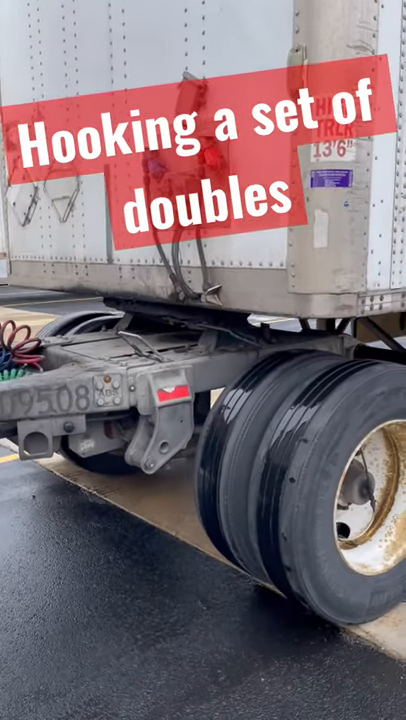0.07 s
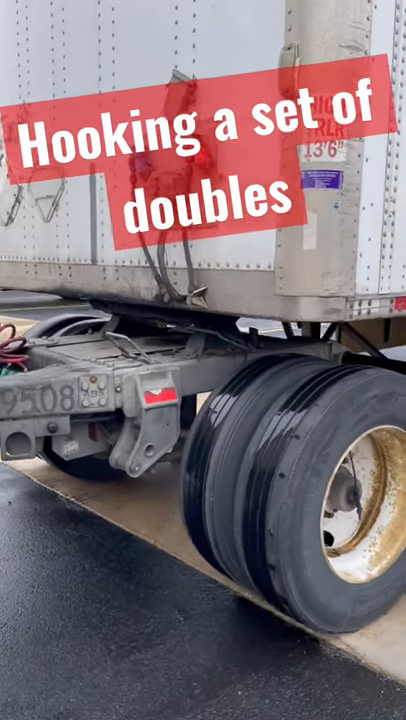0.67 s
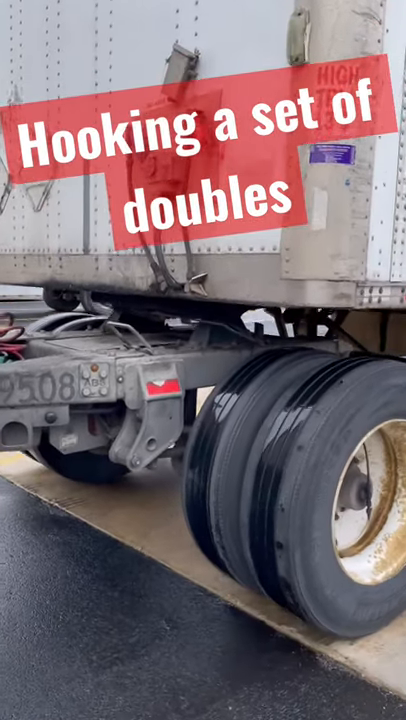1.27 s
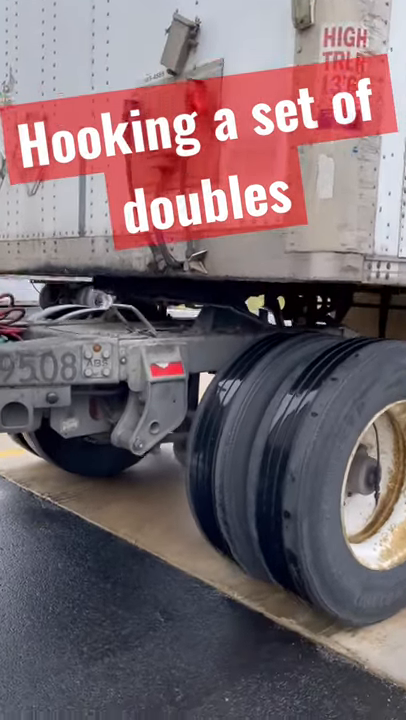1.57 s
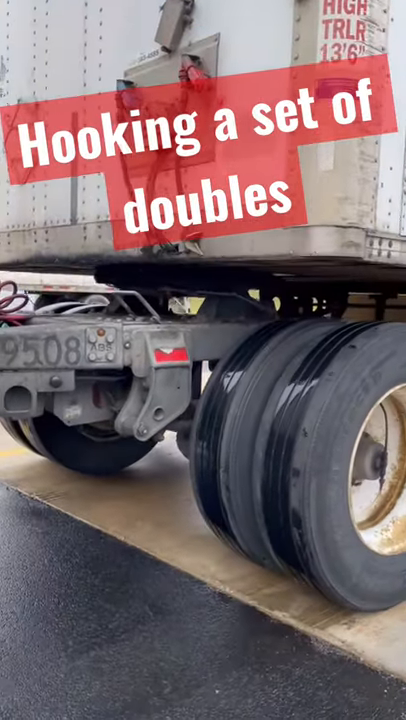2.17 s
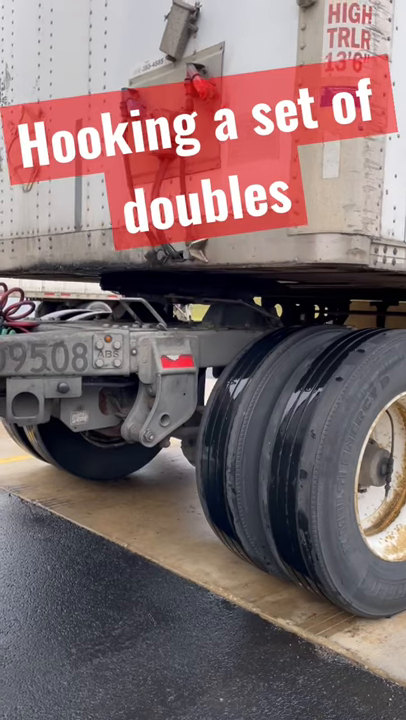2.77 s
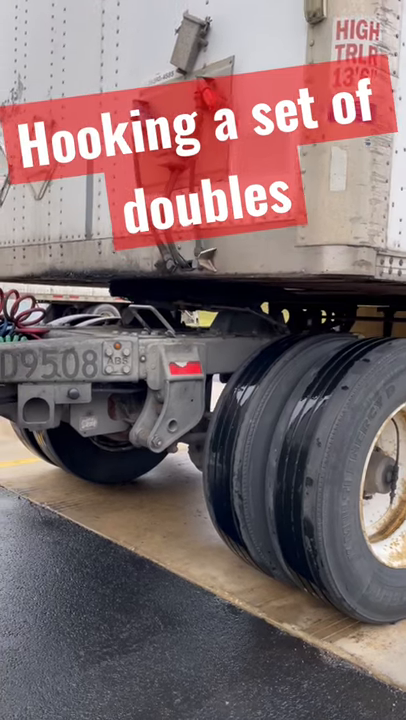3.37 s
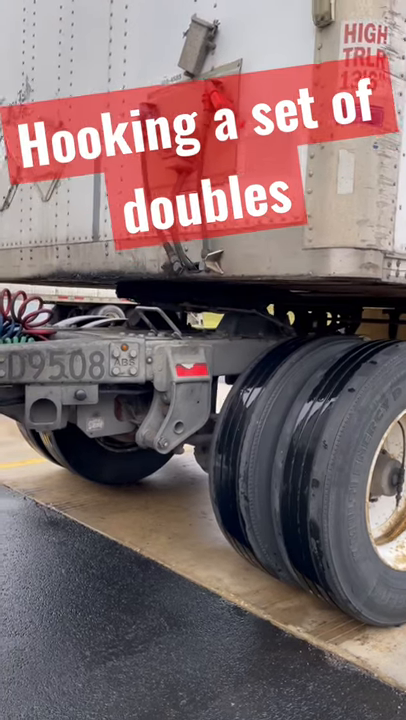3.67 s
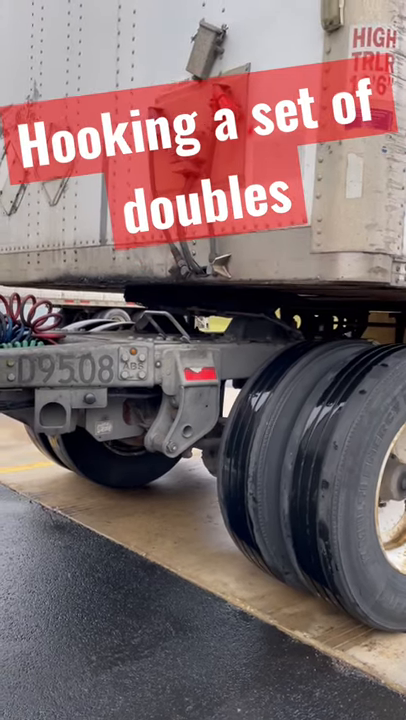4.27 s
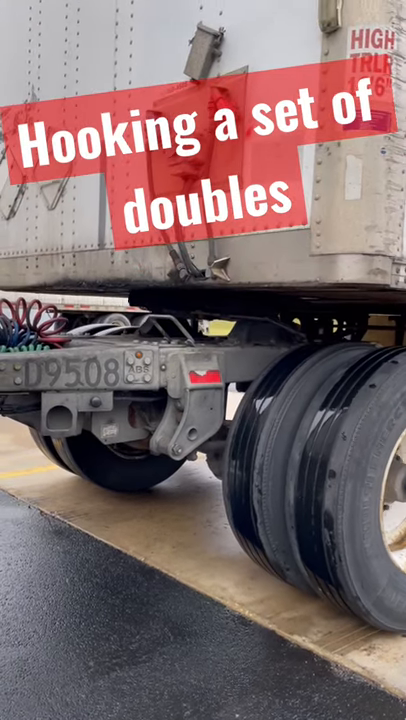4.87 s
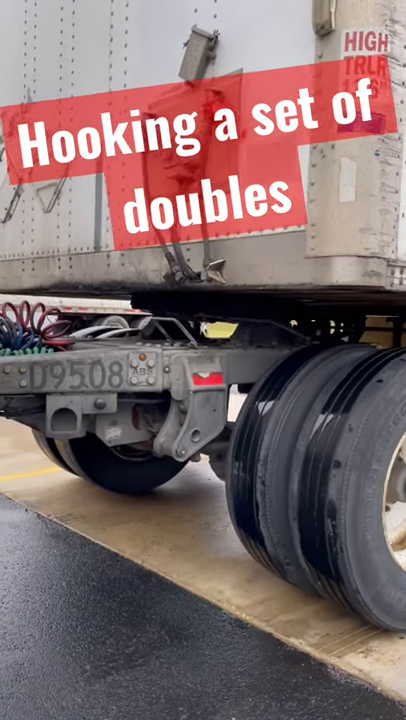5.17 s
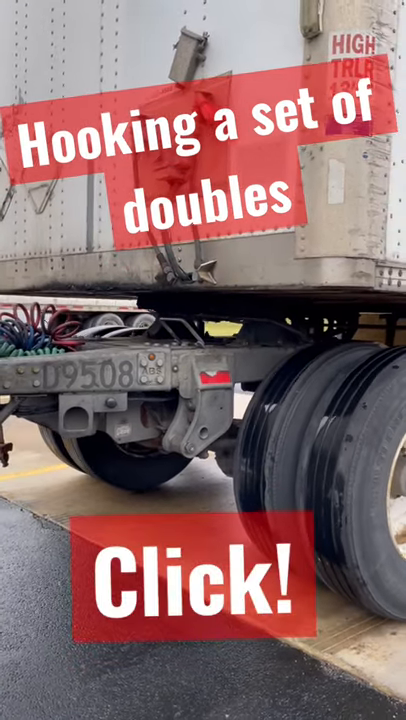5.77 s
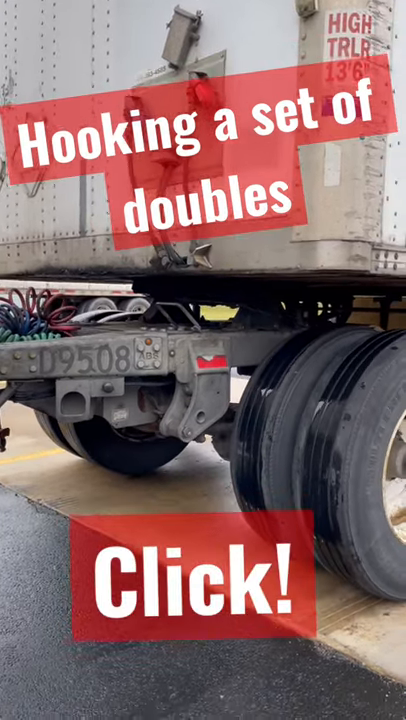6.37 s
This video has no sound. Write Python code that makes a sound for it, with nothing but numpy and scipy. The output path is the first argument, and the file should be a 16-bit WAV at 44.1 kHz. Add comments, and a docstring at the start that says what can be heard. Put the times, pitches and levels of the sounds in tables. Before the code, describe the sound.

A diesel truck labours some way off in an open yard, then settles to a throbbing idle as it backs a dolly under a trailer. Close to the microphone, steel bumps dully and slides with faint whines and low thumps. Near the end, knocks build to a loud metallic slam and a second sharp clank as the coupling locks, with bursts of hissing air and jangling chains.

```python
"""A diesel tractor labours, then idles, some way off in an open yard, backing a converter dolly under a
parked trailer; its firings pulse in the exhaust and make the panels clatter. Close by, the fifth wheel
bumps and slides under the trailer floor, the kingpin slams home and the jaws lock with a second clank,
each impact exciting the modes of the steel frame. Turbulent air hisses and loose steel keeps jangling.
All is heard through two closely spaced microphone ports."""
import sys
import numpy as np
from scipy import signal
from scipy.fft import rfft, irfft, next_fast_len
from scipy.io import wavfile

SR = 44100
rng = np.random.default_rng(int(sys.argv[2]) if len(sys.argv) > 2 else 0)


def bounce(signal):
    """Save signal as a 16-bit WAV file at the path given by the first command-line argument."""
    frames = np.transpose(np.atleast_2d(signal))
    limited = np.clip(frames, -1, 1)
    pcm = np.round(limited * 32767).astype(np.int16)
    wavfile.write(sys.argv[1], SR, pcm)


N = 292824
TIME = np.arange(N) / SR
EDGES_HZ = 22 * 2 ** (np.arange(30) / 3.05)
CENTRES_HZ = np.sqrt(EDGES_HZ[1:] * EDGES_HZ[:-1])

# Response of the struck frame. Each row: frequency in Hz, relative spectral density in dB.
FRAME_SPECTRUM = [(22, -50), (80, 11), (170, -6.5), (280, 0.5), (550, 3), (900, 1), (1400, 0.5),
                  (2300, -3.5), (3500, -5), (4700, -23.5), (5600, -5.5), (8000, -18.5), (11000, -35),
                  (16000, -41)]
# Distinct modes of the frame and kingpin plate. Each row: frequency in Hz, bandwidth in Hz, gain in dB.
STEEL_MODES = [(160, 12, 3), (245, 10, 4), (287, 10, 8), (324, 10, 1), (376, 24, -3), (444, 8, 1),
               (494, 14, 3), (517, 16, 6), (617, 22, 0), (688, 16, 1), (790, 20, 4), (865, 20, 1),
               (1012, 30, 8), (1104, 16, 0), (1257, 18, 1), (1381, 18, -2), (1431, 20, 0), (1632, 12, -1),
               (1765, 30, 0), (1882, 22, 1), (2030, 24, 1), (2111, 20, 0), (2180, 30, 0), (2356, 26, 3),
               (2480, 30, 3), (2620, 30, 1), (2872, 30, 0), (2935, 30, 1), (3490, 70, 5), (3800, 70, 3),
               (4220, 60, 2), (4533, 40, 2), (5450, 200, 3), (7000, 40, 7)]
# The dolly slams into the trailer. Each row: start in seconds; the crack's level in dB, pitch in Hz and
# treble corner in Hz; the body's level in dB, pitch in Hz, boom in dB, length factor and delay in
# seconds; the rebound's delay in seconds and loss in dB; the settling delay in seconds.
SLAMS = [(1.380, -28.5, 1500, 8000, -20, 536, 16.5, 0.39, 0.00404, 0.015, 3, 0.023),
         (5.41, -7, 4200, 7200, -13, 540, 13, 0.69, 0.00518, .0175, 0.5, .046),
         (5.899, -4, 2420, 4340, -7, 850, -4, 0.4, .002, 0.026, 20, 0.038)]


def from_db(db):
    """Amplitude grows tenfold for every 20 dB."""
    return 10 ** (np.asarray(db) / 20)


def unit_power(x):
    """Division by the RMS value gives a mean power of 1."""
    return x / np.sqrt(np.mean(x ** 2) + 1e-20)


def at_hz(points, hz):
    """Interpolation along a logarithmic frequency axis."""
    frequencies, values = np.transpose(points)
    return np.interp(np.log(hz), np.log(frequencies), values)


def drift(rate):
    """Random modulation of unit power that changes course about rate times a second."""
    knots = rng.standard_normal(int(N / SR * 400))
    return unit_power(np.interp(TIME * rate, np.arange(len(knots)), knots))


def envelope(start, attack, hold, fade_db_per_s):
    """A linear rise and a hold, then exponential decay."""
    t = TIME - start
    return np.clip(t / attack, 0, 1) * from_db(-fade_db_per_s * np.maximum(t - attack - hold, 0))


def swell(peak_s, half_width_s):
    """A Gaussian pulse, down to 1/e one half-width from its peak."""
    return np.exp(-((TIME - peak_s) / half_width_s) ** 2)


def ring(force, hz, t60):
    """A damped oscillator answers a unit impulse with a decaying sine of height 1."""
    r, w = from_db(-60 / (t60 * SR)), 2 * np.pi * hz / SR
    return signal.lfilter([0, np.sin(w)], [1, -2 * r * np.cos(w), r * r], force + 1e-18)


def resonance(x, hz, width_hz):
    """A two-pole resonator passes a narrow band with a peak gain of 1."""
    r, w = np.exp(-np.pi * width_hz / SR), 2 * np.pi * hz / SR
    zeros = np.array([1, 0, -1]) * (1 - r * r) / 2
    return signal.lfilter(zeros, [1, -2 * r * np.cos(w), r * r], x + 1e-18)


def pitched_noise(hz, width_hz):
    """Two resonators in series narrow white noise to a rough tone of unit power."""
    return unit_power(resonance(resonance(rng.standard_normal(N), hz, width_hz), hz, width_hz))


def noise_bands(correlation):
    """Partly coherent noise at two ports, in third octaves of unit power: bands x 2 x N."""
    white, bands = rng.standard_normal((2, 2, N)), []
    for k, hz in enumerate(CENTRES_HZ):
        bandpass = signal.butter(2, EDGES_HZ[k:k + 2], "band", fs=SR, output="sos")
        mid, side = signal.sosfilt(bandpass, white[k % 2])
        alike = np.clip(at_hz(correlation, hz), 0, 1)
        bands.append(unit_power(np.sqrt(1 + alike) * mid + np.sqrt(1 - alike) * side * [[1], [-1]]))
    return np.array(bands, np.float32)


def band_gains(spectrum):
    """Band power is spectral density times bandwidth; the squared gains sum to 1."""
    gain = from_db(at_hz(spectrum, CENTRES_HZ)) * np.sqrt(CENTRES_HZ)
    return gain / np.linalg.norm(gain)


def coloured(bands, spectrum):
    """Weighted bands superpose into steady noise of the given spectrum."""
    return np.tensordot(band_gains(spectrum).astype(np.float32), bands, 1)


def ports(x, phase_lead):
    """Diffraction round the housing gives the left port a phase lead that depends on frequency."""
    size = next_fast_len(N + 2048)
    lead = np.interp(np.arange(size // 2 + 1) * SR / size, *np.transpose(phase_lead))
    return irfft(rfft(x, size) * np.exp(.5j * lead * np.array([[1], [-1]])), size)[:, :N]


def whines(fade_s=0.019, surge_db=2):
    """Narrow-band noise from the fan, gears and dragging brakes is heard as faint pitches."""
    # Each row: start and end in seconds, frequency and bandwidth in Hz, level in dB.
    whine_bands = [(1.8, 5.2, 870, 120, -57), (3.6, 5.0, 838, 45, -55), (1.8, 5.0, 1340, 45, -59),
                   (1.7, 2.7, 1820, 70, -60), (2.5, 4.2, 2710, 45, -63), (2.5, 4.9, 2850, 55, -66),
                   (2.0, 4.9, 3640, 110, -68), (2.8, 4.9, 4020, 80, -62.5), (4.25, 4.55, 3300, 90, -60)]
    out = np.zeros(N)
    for start, end, hz, width_hz, db in whine_bands:
        gate = np.clip(np.minimum(TIME - start, end - TIME) / fade_s, 0, 1)
        out += pitched_noise(hz, width_hz) * from_db(db + surge_db * drift(5.9)) * gate
    return out


def rolling(end_s=1.82, fade_db_per_s=61):
    """Free rolling holds at 1, then decays exponentially once the plate drags under the trailer."""
    return from_db(-fade_db_per_s * np.maximum(TIME - end_s, 0))


def rumble(bands, firing_phase, idle_db=-42, rolling_db=-34.5, throb=0.39):
    """Incoherent sources add in power: engine, wheels and swaying trailer, throbbing with each firing."""
    # Each row: frequency in Hz, relative spectral density in dB.
    spectrum = [(22, -60), (35, -12.5), (65, 0.5), (100, 0), (150, -3), (210, -9.5), (300, -14.5),
                (450, -21.5), (900, -56), (16000, -102)]
    # Sways of the empty trailer. Each row: peak time in seconds, level in dB, half-width in seconds.
    sways = [(3.477, -38.5, 0.14), (5.043, -38.5, 0.41), (5.596, -28.5, 0.22), (6.265, -29, 0.078)]
    sway_power = sum((from_db(db) * swell(s, width)) ** 2 for s, db, width in sways)
    level = np.sqrt(from_db(idle_db) ** 2 + (from_db(rolling_db) * rolling()) ** 2 + sway_power)
    return level * coloured(bands, spectrum) * (1 + throb * np.cos(firing_phase))


def clatter(bands, firing_phase, level_db=-39.5, rolling_db=0.5, uneven_db=0.7, knock=0.12):
    """Diesel noise, its lower part modulated by the firings, forces the tractor's panels to resonate."""
    # Each row: frequency in Hz, relative spectral density in dB.
    spectrum = [(22, 12), (200, -5.5), (400, -0.5), (600, 1.5), (900, -1), (1300, -5.5), (2200, -13.5),
                (3400, -15), (4600, -21), (6200, -24), (8000, -34.5), (11000, -31.5), (16000, -36.5)]
    # Panel modes. Each row: frequency in Hz, bandwidth in Hz, gain in dB.
    panels = [(685, 17, -9), (907, 50, -4), (1176, 13, -20), (1870, 42, -2.5), (2150, 97, -10),
              (3230, 330, -14)]
    noise = from_db(level_db + rolling_db * rolling() + uneven_db * drift(35)) * coloured(bands, spectrum)
    lows = signal.sosfilt(signal.butter(1, 1500, fs=SR, output="sos"), noise)
    drive = noise + knock * np.cos(firing_phase) * lows
    ringing = sum(from_db(db + 2.9 * drift(4.1)) * resonance(drive, hz, width) for hz, width, db in panels)
    return drive + ringing


def exhaust(firing_phase, level_db=-41, push_db=5, waver_db=2.5, jitter_radians=0.23):
    """Nearly periodic pulses form a harmonic series whose balance and level follow the engine's load."""
    # Each row: multiple of the firing rate, relative level in dB at idle and with the clutch pulling.
    harmonics = [(1, -3.5, -19), (2, 1.5, 1), (3, -3, -1), (4, 1, 8), (5, -5.5, -7.5), (6, -27, -4),
                 (7, -9.5, -5.5), (8, -10.5, -14), (9, -13, -25)]
    clutch_out_s, clutch_fade_s = 1.46, 0.16
    pull = np.clip((clutch_out_s - TIME) / clutch_fade_s + .5, 0, 1)
    tones = np.zeros(N)
    for k, idle_db, pull_db in harmonics:
        gain = from_db(idle_db + (pull_db - idle_db) * pull + waver_db * drift(14))
        phase = round(k) * firing_phase + rng.uniform(0, 2 * np.pi) + jitter_radians * drift(15)
        tones += gain * np.cos(phase)
    push = swell(peak_s=5.13, half_width_s=0.55)  # the engine labours to push the dolly home
    return tones * from_db(level_db + push_db * push)


def tractor():
    """One firing cycle paces rumble, clatter and exhaust; load drags it down, then it returns to idle."""
    # Engine speed. Each row: time in seconds, firings per second.
    firing_rate = [(0, 40.3), (.9, 40.8), (1.05, 34.5), (1.27, 27.8), (1.55, 36), (3, 35.5), (6.6, 34.7)]
    # Likeness of the two ports. Each row: frequency in Hz, correlation from 0 to 1.
    correlation = [(60, .9), (130, .82), (300, .86), (700, .7), (2000, .6), (4000, .5), (7000, .6),
                   (9000, .997), (11000, .997), (16000, .85)]
    firing_phase = 2 * np.pi * np.cumsum(np.interp(TIME, *np.transpose(firing_rate))) / SR
    bands = noise_bands(correlation)
    return rumble(bands, firing_phase) + clatter(bands, firing_phase) + exhaust(firing_phase)


def thumps(right_bias_db=0.5):
    """Low pressure pulses, a few cycles long at most, push a little harder on the right port."""
    # Each row: peak time in seconds, level in dB, frequency in Hz, half-width in seconds.
    pulses = [(1.416, -24, 164, 0.022), (1.625, -28, 177, 0.0034), (3.34, -10, 107, 0.0054),
              (3.51, -24, 72, 0.016), (3.556, -28, 123, 0.016), (3.574, -24, 177, 0.0053),
              (4.305, -22, 198, 0.0021), (4.339, -24, 115, 0.0084)]
    pressure = sum(from_db(db) * swell(s, width) * np.sin(2 * np.pi * hz * (s - TIME))
                   for s, db, hz, width in pulses)
    return pressure * from_db([[-right_bias_db / 2], [right_bias_db / 2]])


def shaking(attack_s=0.0053, fade_db_per_s=35):
    """Each jolt adds energy to the swing of the loose steel, and damping slowly drains it."""
    # Each row: start in seconds, level in dB.
    jolts = [(4.95, -59), (5.41, -47), (6.14, -42), (6.46, -46.5)]
    return np.sqrt(sum((from_db(db) * envelope(s, attack_s, 0, fade_db_per_s)) ** 2 for s, db in jolts))


def jangle(touches_per_s=90, gain_db=5, mistune=0.0027):
    """Chains and fittings collide at random; like parts ring at slightly different pitches and beat."""
    # Each row: frequency in Hz, relative level in dB, 60 dB decay time in seconds.
    modes = [(1930, 2.5, 0.24), (2255, 6, 0.24), (2484, 0.5, 0.18), (2654, -5.5, .12), (2850, -4.5, .12),
             (3040, -12, 0.19), (3240, -19, .06), (3430, 3.5, 0.13), (3790, -2.5, 0.089), (5300, -12, 0.11),
             (5280, -6, 0.13), (5580, -0.5, 0.24), (5782, -16, .08), (5820, -1, 0.34), (6616, -27, .1)]
    force = (rng.random(N) < touches_per_s / SR) * shaking()
    rings = sum(from_db(db) * ring(force * rng.standard_normal(N), hz * pitch, t60) / np.sqrt(t60)
                for hz, db, t60 in modes for pitch in (1 - mistune / 2, 1 + mistune / 2))
    return from_db(gain_db) * rings / np.sqrt(touches_per_s)


def singing(waver_db=5.0, waver_radians=0.45):
    """The most lightly damped fittings sustain wavering tones for as long as the steel swings."""
    # Each row: frequency in Hz, relative level in dB.
    tones = [(2229, -4.5), (2480, -12), (3456, -13), (5911, -13.5)]
    return shaking() * sum(from_db(db + waver_db * drift(18))
                           * np.sin(2 * np.pi * hz * TIME + waver_radians * drift(25)) for hz, db in tones)


def chain_links(gain_db=-11, tilt_db_per_octave=5.5, count=64, touches_per_s=120, lowest_hz=2800):
    """Each collision excites all the small links unevenly; the smallest ring highest and die soonest."""
    out = np.zeros(N)
    touches = np.flatnonzero(rng.random(N) < touches_per_s / SR)
    shake = shaking()[touches]
    for hz in np.geomspace(lowest_hz, 15000, count) * rng.uniform(.98, 1.02, count):
        force, octaves = np.zeros(N), np.log2(hz / lowest_hz)
        force[touches] = shake * rng.standard_normal(len(touches))
        t60 = .06 * .5 ** (octaves / 2)
        out += ring(force, hz, t60) * from_db(tilt_db_per_octave * octaves) / np.sqrt(t60)
    return from_db(gain_db + 2 * drift(47)) * out / np.sqrt(touches_per_s)


def sizzle(level_db=-46, count=14, width_hz=110):
    """A thin, flickering sizzle at 12-15 kHz on top of the loudest hiss: modulated narrow-band noise."""
    centres_hz = np.linspace(12300, 15200, count) + rng.normal(0, 70, count)
    flicker = sum(resonance(rng.standard_normal(N), hz, width_hz) * from_db(5 * drift(28))
                  for hz in centres_hz)
    return from_db(level_db) * unit_power(flicker)


def valve(flutter_db=4.0):
    """Cavity resonance: the flow whistles loosely in the hollows of the valve."""
    # Each row: frequency in Hz, bandwidth in Hz, level in dB.
    cavities = [(2200, 150, -60), (2520, 150, -59), (2940, 120, -65), (3730, 130, -53.5),
                (5500, 150, -53.5), (5680, 86, -53.5), (6140, 150, -56.5)]
    return sum(from_db(db + flutter_db * drift(30)) * pitched_noise(hz, width_hz)
               for hz, width_hz, db in cavities)


def air(bands, jet_gain_db=1.5, jet_fade_db_per_s=154, patchy_db=2.5, pivot_hz=12000):
    """Turbulence makes bright hiss: long, fluttering jets as the dolly is braked, and short spits."""
    # Each row: frequency in Hz, relative spectral density in dB.
    spectrum = [(22, -42), (1000, 8.5), (2200, 13), (3600, 4.5), (4700, 7.5), (5700, 1), (7200, 4),
                (9000, 2.5), (12000, -8), (14000, -1), (16000, 0)]
    # Each row: start in seconds, level in dB, hold in seconds, tilt in dB per octave.
    jets = [(4.93, -53.5, 0.55, 0), (5.242, -52, 0.15, -1), (5.417, -41, 0.33, 0.5), (5.8, -45.5, 0.87, 0)]
    # Each row: start in seconds, level in dB, tilt in dB per octave, fade in dB per second.
    spits = [(.24, -47.5, 1, 315), (1.3, -50, -0.5, 400), (1.379, -41, 1.5, 800), (5.328, -39, 18, 327),
             (5.475, -33, 20, 253), (5.725, -42, -1, 327), (5.899, -23, -2.5, 396), (5.965, -25.5, 0, 700),
             (5.997, -31, -2, 450), (6.075, -36.5, 4, 329), (6.134, -32, 13, 325), (6.188, -32, 5, 327),
             (6.468, -44, 19, 327)]
    flutter = from_db(jet_gain_db - 0.5 * drift(55) - 2.5 * drift(14))
    flows = [(from_db(db) * flutter * envelope(s, 0.038, hold, jet_fade_db_per_s), tilt)
             for s, db, hold, tilt in jets]
    flows += [(from_db(db) * envelope(s, 0.0022, 0.017, fade), tilt) for s, db, tilt, fade in spits]
    powers = np.array([flow ** 2 for flow, _ in flows])
    tilts = np.array([tilt for _, tilt in flows])
    hiss = np.zeros((2, N))
    for band, gain, hz in zip(bands, band_gains(spectrum), CENTRES_HZ):
        if hz > 1000:
            power = from_db(tilts * np.log2(hz / pivot_hz)) ** 2 @ powers
            hiss += band * (gain * np.sqrt(power) * from_db(patchy_db * drift(35)))
    strongest_jet = envelope(5.412, attack=0.011, hold=0.35, fade_db_per_s=jet_fade_db_per_s)
    return hiss + (sizzle() + valve()) * strongest_jet


def contacts():
    """Single knocks, and four impacts per slam: steel cracks, the frame takes the load, rebound, rest."""
    # Knocks of the plate, kingpin and jaws. Each row: start in seconds, level in dB, treble corner in Hz,
    # boom in dB, length factor, favoured pitch in Hz. The slams add rows of the same form.
    knocks = [(.245, -42.5, 14000, -8, 0.7, 4540), (1.297, -34.5, 1500, -5, 2.2, 560),
              (1.398, -28, 1100, 8, 0.45, 520), (1.793, -38, 12000, -3, 0.19, 4500),
              (3.572, -41, 400, 4, 0.4, 280), (4.304, -26.5, 800, -5, 0.3, 326),
              (4.935, -25.5, 510, 10, 0.94, 450), (4.956, -20, 450, 9, 0.34, 302),
              (5.05, -32, 300, 18, 3.7, 278), (5.105, -29, 560, 12, 0.64, 535),
              (5.261, -19, 2230, 7, 1.15, 1070), (5.321, -21, 1950, 12, 1.4, 980),
              (5.818, -32, 1500, 16, 0.69, 646), (5.88, -15.5, 2600, -10, 1.75, 1800),
              (5.967, -17, 12000, -19, 0.55, 2620), (5.9945, -13, 9100, -1, 0.44, 463),
              (6.012, -28, 900, 15, 1.9, 420), (6.195, -26.5, 704, -1.5, 5.5, 420),
              (6.285, -46, 600, 1, 1.5, 480), (6.48, -31, 480, -11, 15, 473)]
    rows = list(knocks)
    for (s, crack_db, crack_hz, corner_hz, body_db, body_hz, boom_db, length,
         body_s, rebound_s, loss_db, settle_s) in SLAMS:
        body_corner_hz = 1240 * 2 ** (body_db / 23)  # a gentler slam gives a duller thud
        crack = (s, crack_db, corner_hz, -3, 0.59, crack_hz)
        body = (s + body_s, body_db, body_corner_hz, boom_db, length, body_hz)
        rebound = (s + rebound_s, crack_db - loss_db, corner_hz * 0.41, 0, 0.52, 2240)
        settling = (s + settle_s, body_db - 1, 650, -5, 0.35, 283)
        rows += [crack, body, rebound, settling]
    return rows


def blow_colour(hz, corner_hz, boom_db, favoured_hz, boom_hz=330, slope=1.66):
    """The contact point favours modes near one pitch; soft blows lose treble, heavy ones boom the floor."""
    hollow_db = 6 * np.exp(-(np.log2(hz / favoured_hz) / .36) ** 2)
    floor_db = boom_db / (1 + (hz / boom_hz) ** 2)
    return from_db(hollow_db + floor_db) / np.sqrt(1 + (hz / corner_hz) ** (2 * slope))


def scrape(hz, length_s=0.096, end_db=-10, growth_db=21, judder_db=2):
    """Friction power per band: the kingpin judders ever harder along the throat until the last slam."""
    to_go = (SLAMS[-1][0] - TIME) / length_s
    sliding = (to_go > 0) * (to_go < 1)
    level = from_db(end_db - growth_db * np.clip(to_go, 0, 1) ** 0.5 + judder_db * drift(220)) * sliding
    return (blow_colour(hz, corner_hz=2000, boom_db=0, favoured_hz=590) * level) ** 2


def impact_power(hz, tail_db=-27, tail_t60=0.36):
    """Each blow's band power decays exponentially in the frame and reverberates in the hollow trailer."""
    # Damping of the frame. Each row: frequency in Hz, 60 dB decay time in seconds.
    decay_times = [(60, 0.1), (280, 0.73), (600, 0.74), (1200, 0.2), (2500, 0.26), (6000, 0.23),
                   (16000, 0.049)]
    power, t = np.zeros((len(hz), N)), TIME[:SR]
    t60 = at_hz(decay_times, hz)
    tail = from_db(tail_db - 60 * t / tail_t60) ** 2
    for s, blow_db, corner_hz, boom_db, length, favoured_hz in contacts():
        start = round(s * SR)
        rise_s = 0.0016 * length ** 0.9 * 2 ** (-blow_db / 24)  # glancing or gentle blows build slowly
        fade = from_db(-60 * t / (t60 * length)) ** 2 + tail
        strength = from_db(blow_db) * blow_colour(hz, corner_hz, boom_db, favoured_hz)
        blow = strength ** 2 * fade * np.minimum(t / rise_s, 1)
        power[:, start:start + SR] += blow[:, :N - start]
    return power


def coupling(bands, gain_db=-8.0, chatter_db=0.5, patchy_db=2.5, left_db=3.0, left_hz=900):
    """Struck and scraped, the frame's crowded modes overlap into noise; distinct modes ring out of it."""
    chatter = chatter_db * drift(300)  # steel faces rebound on each other
    powers = scrape(CENTRES_HZ[:, None]) + impact_power(CENTRES_HZ[:, None])
    leans_db = left_db * np.exp(-np.log2(CENTRES_HZ / left_hz) ** 2)  # the midrange favours the left port
    crash = np.zeros((2, N))
    for band, gain, power, lean in zip(bands, band_gains(FRAME_SPECTRUM), powers, leans_db):
        level = gain * np.sqrt(power) * from_db(chatter + patchy_db * drift(150))
        crash += band * level * from_db([[lean / 2], [-lean / 2]])
    rings = sum(from_db(db) * resonance(crash, hz, width_hz) for hz, width_hz, db in STEEL_MODES)
    return from_db(gain_db) * (crash + rings)


def clang(gain_db=-25, scatter_db=0.5):
    """Impulse response: the first instant of each contact sets the steel's modes in free vibration."""
    s, blow_db, corner_hz, boom_db, _, favoured_hz = np.transpose(contacts())
    out = np.zeros(N)
    for hz, width_hz, db in STEEL_MODES:
        strength_db = blow_db + db + at_hz(FRAME_SPECTRUM, hz) + scatter_db * rng.standard_normal(len(s))
        strength = from_db(strength_db) * blow_colour(hz, corner_hz, boom_db, favoured_hz)
        force = np.zeros(N)
        force[(s * SR).astype(int)] = strength * rng.choice([-1, 1], len(s))
        out += ring(force, hz, t60=np.log(1000) / (np.pi * width_hz))
    return from_db(gain_db) * out


def scene():
    """Phase differences between the ports set the nearby coupling apart from the tractor on the left."""
    # Likeness of the two ports for the coupling. Each row: frequency in Hz, correlation from 0 to 1.
    correlation = [(60, .95), (300, .96), (800, .9), (1700, .96), (3500, .8), (6000, .85), (9000, .997),
                   (11000, .997), (16000, .93)]
    # Lead of the left port for each source. Each row: frequency in Hz, phase in radians.
    coupling_lead = [(20, 0), (400, .1), (860, .45), (1700, .1), (4100, .5), (4650, 1.3), (5050, 5.7),
                     (6200, 6.4), (7200, 7.5), (8500, 8.6), (9300, 9.35), (11000, 9.5), (12200, 10.6),
                     (14000, 12.1), (16000, 12.6)]
    tractor_lead = [(20, 0), (300, .25), (1300, 1.1), (2200, 1.4), (3200, 2.3), (5200, 2.4), (6400, 1.0),
                    (8200, 2.1), (9200, 3.05), (11600, 3.25), (14000, 5.6), (16000, 6.2)]
    bands = noise_bands(correlation)
    near = coupling(bands) + clang()
    near += air(bands[:, :, ::-1])  # reversed in time, the noise is uncorrelated with the frame's
    near += jangle() + singing() + chain_links() + thumps()
    return ports(near, coupling_lead) + ports(tractor() + whines(), tractor_lead)


def record(dry, bass_hz=30, dull_hz=15000, cutoff_hz=15750, ceiling=1.4):
    """Band limiting removes the deepest bass and highest treble; soft saturation rounds the peaks."""
    dry = signal.sosfilt(signal.butter(8, bass_hz, "high", fs=SR, output="sos"), dry)
    dry = signal.sosfilt(signal.butter(6, dull_hz, fs=SR, output="sos"), dry)
    rounded = ceiling * np.tanh(dry / ceiling)
    return signal.sosfilt(signal.ellip(14, .1, 80, cutoff_hz, fs=SR, output="sos"), rounded)


dry = scene()
out = record(dry)
bounce(out)
```